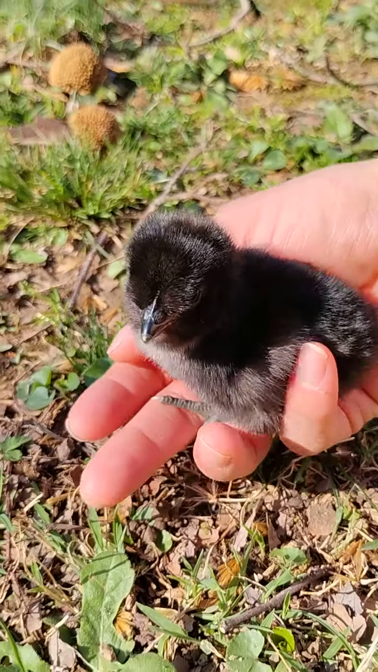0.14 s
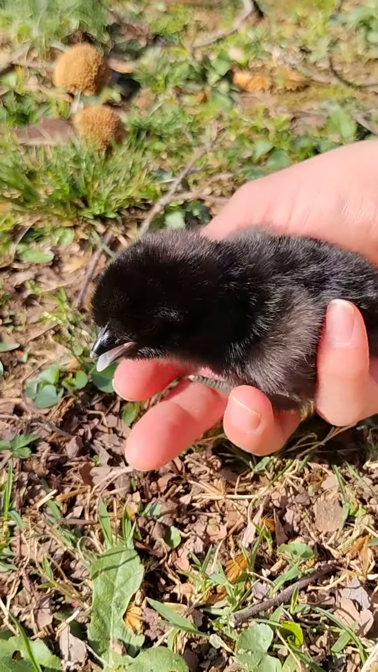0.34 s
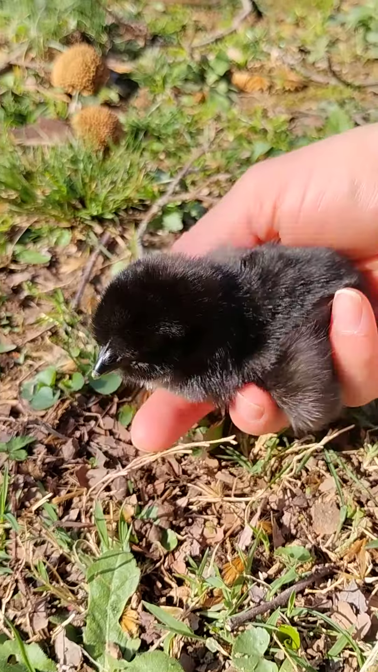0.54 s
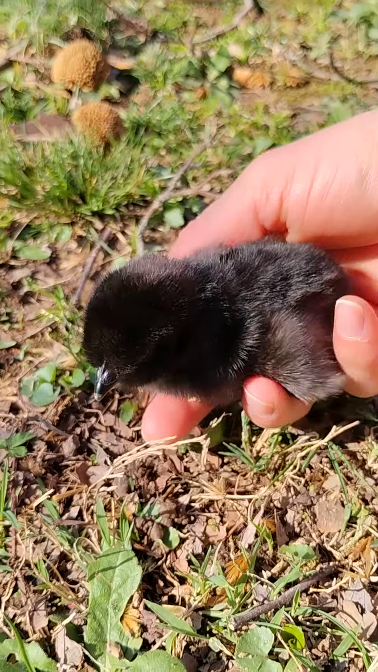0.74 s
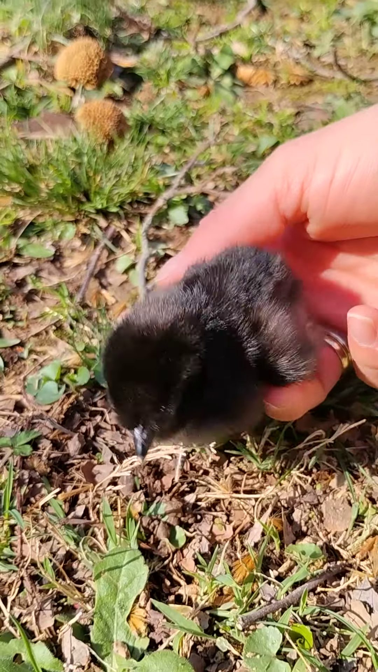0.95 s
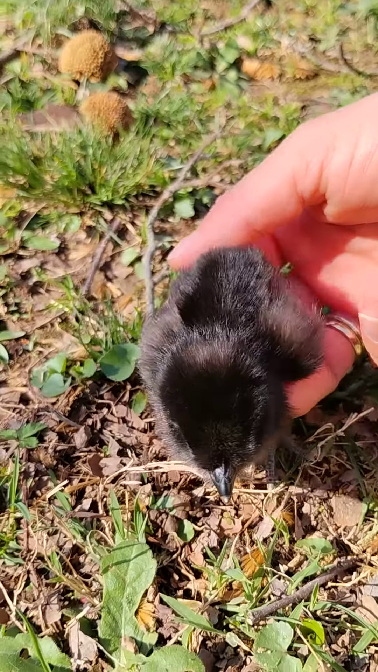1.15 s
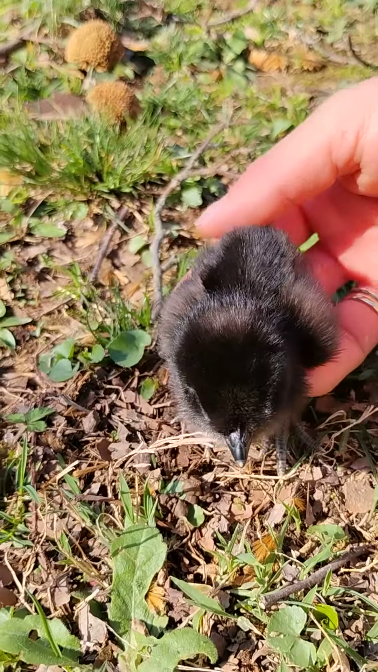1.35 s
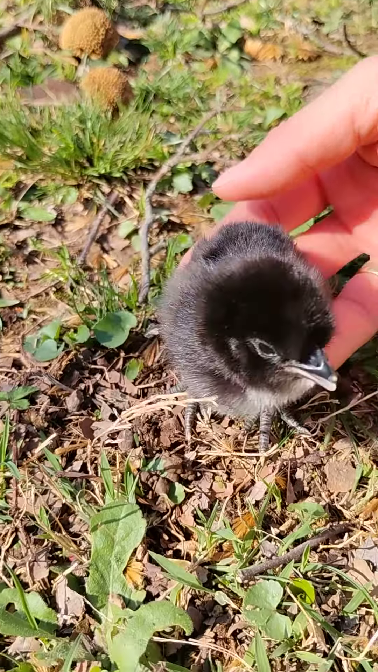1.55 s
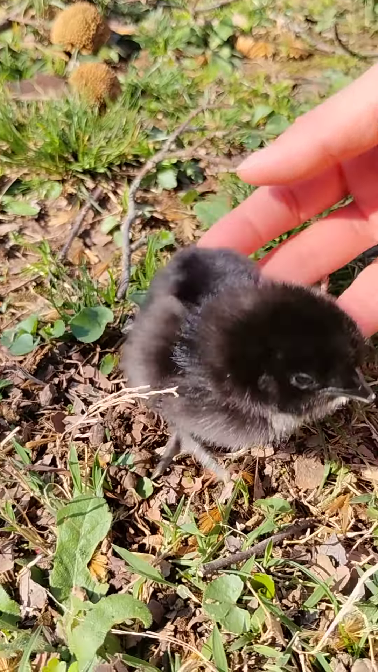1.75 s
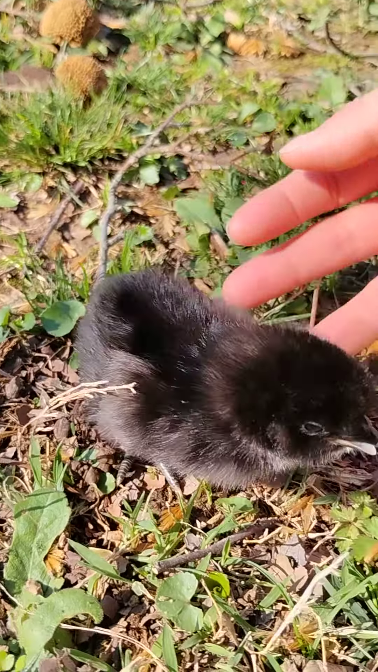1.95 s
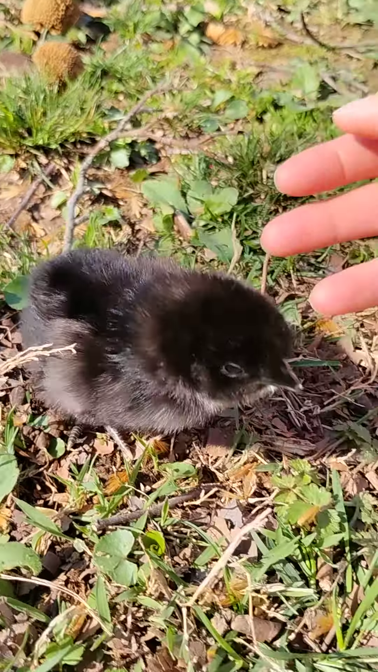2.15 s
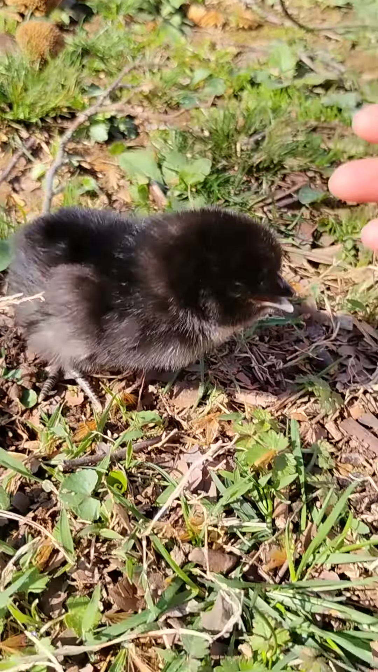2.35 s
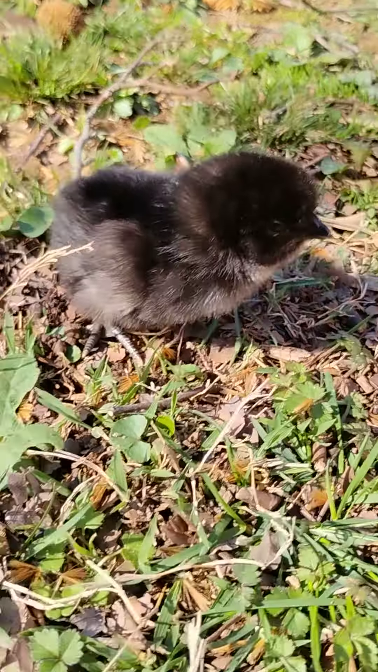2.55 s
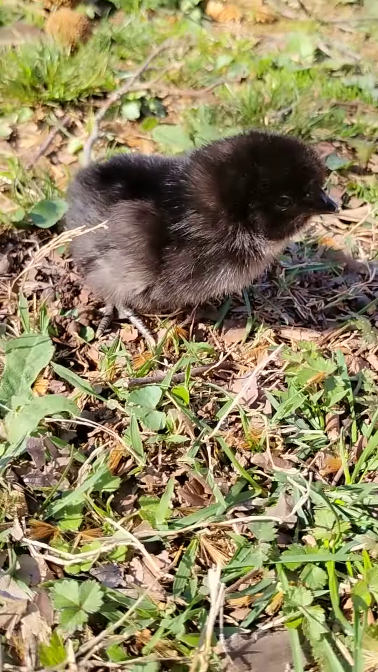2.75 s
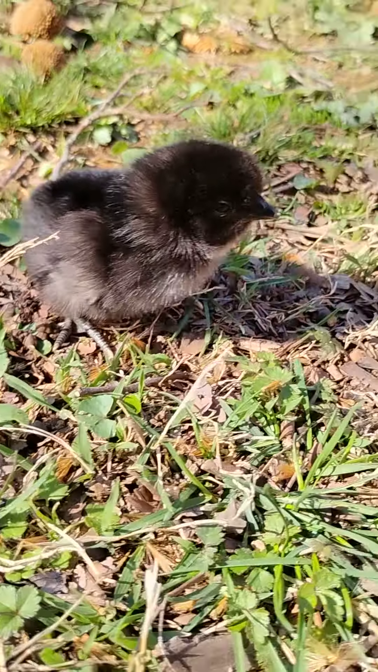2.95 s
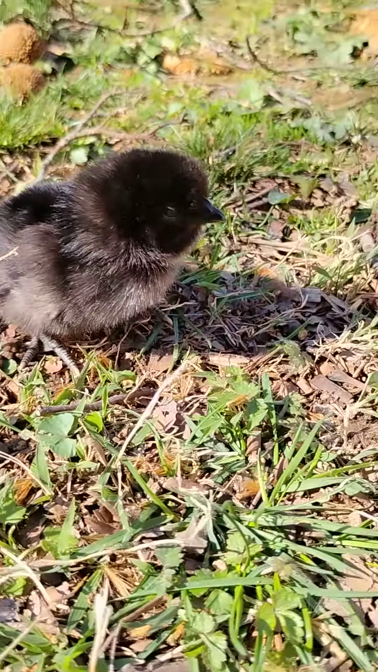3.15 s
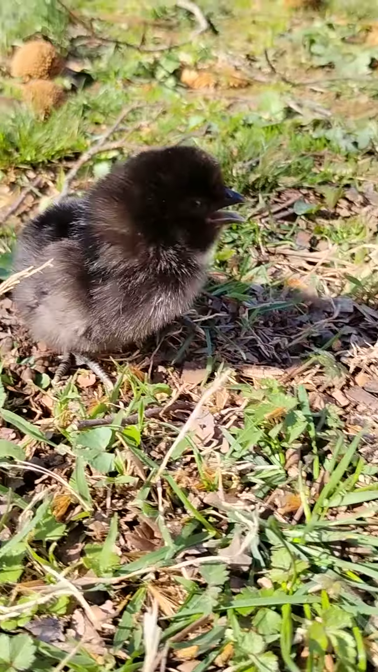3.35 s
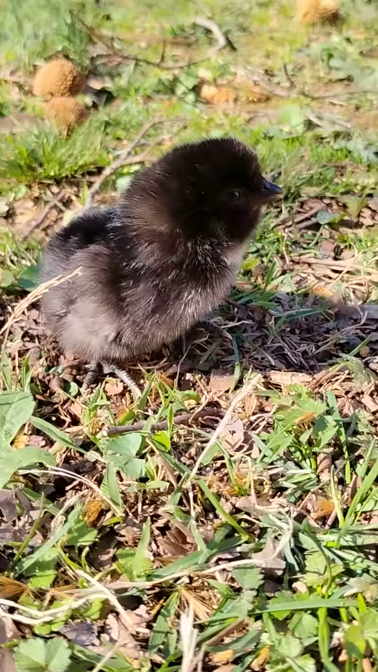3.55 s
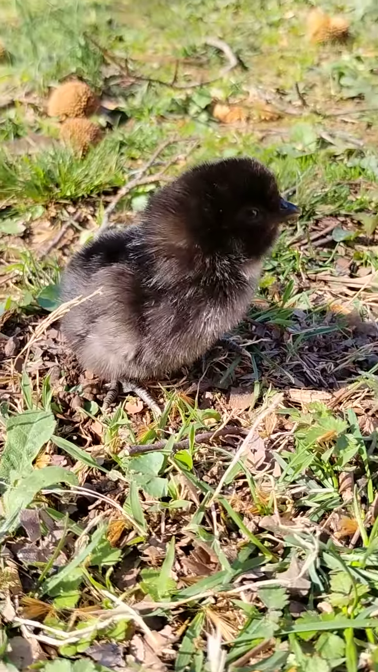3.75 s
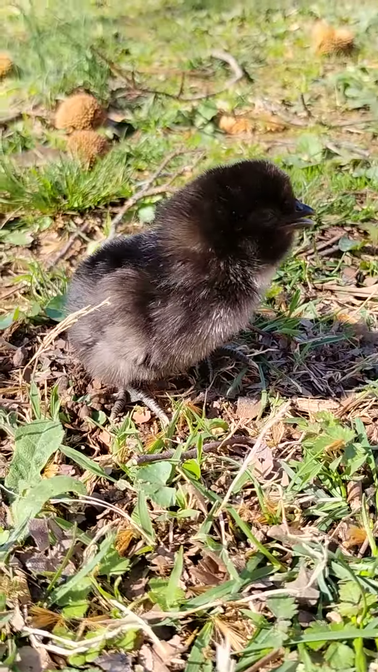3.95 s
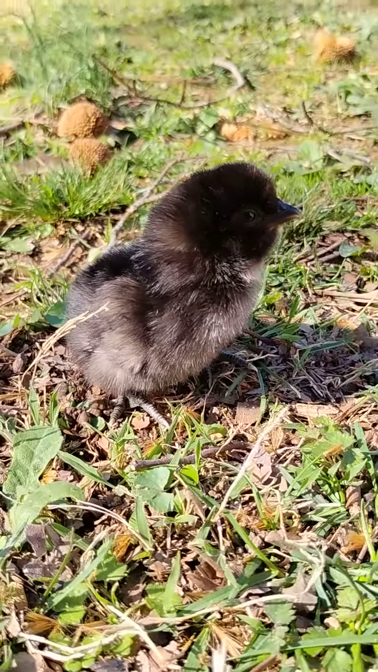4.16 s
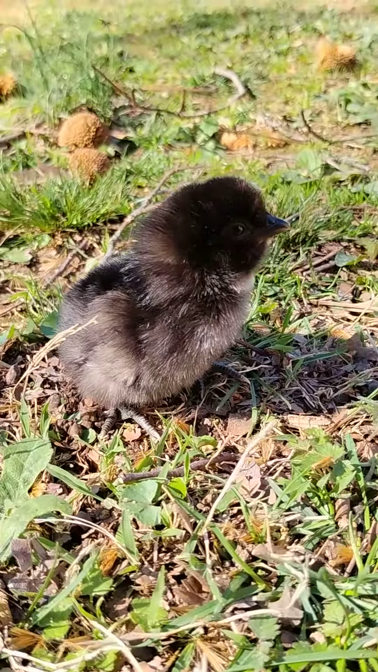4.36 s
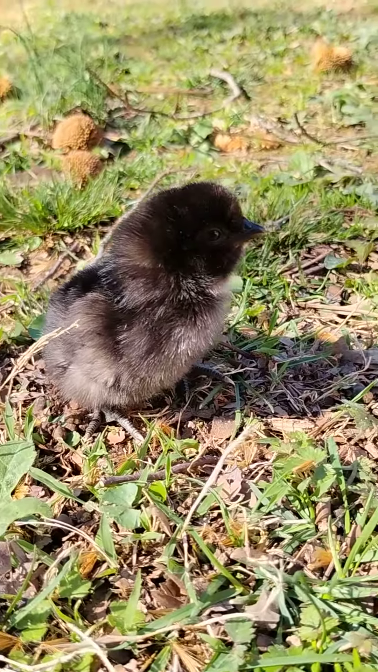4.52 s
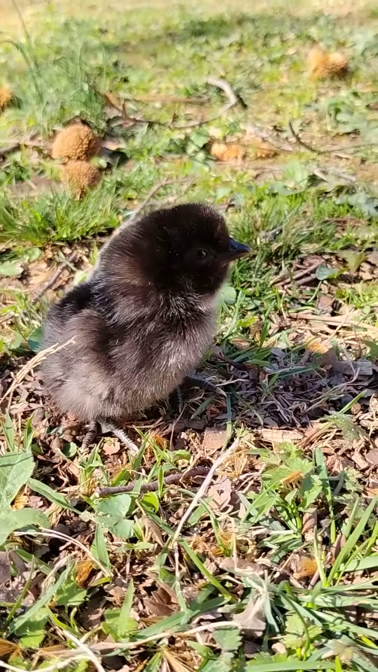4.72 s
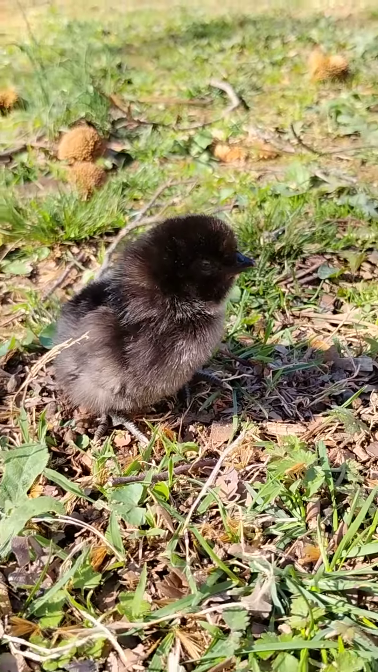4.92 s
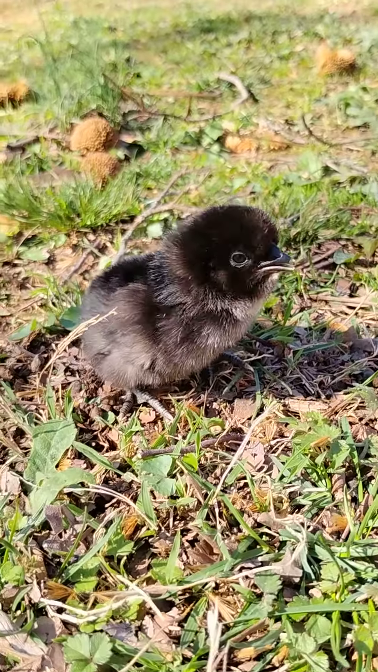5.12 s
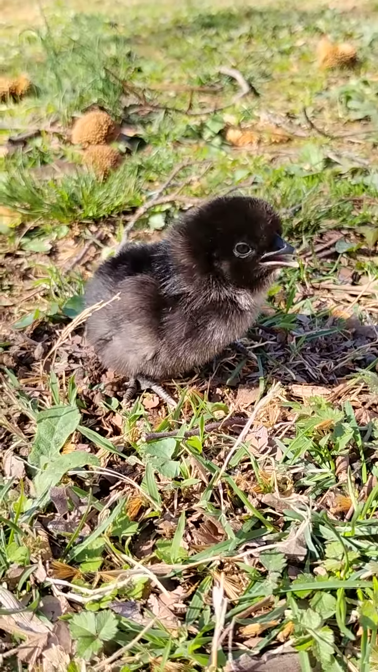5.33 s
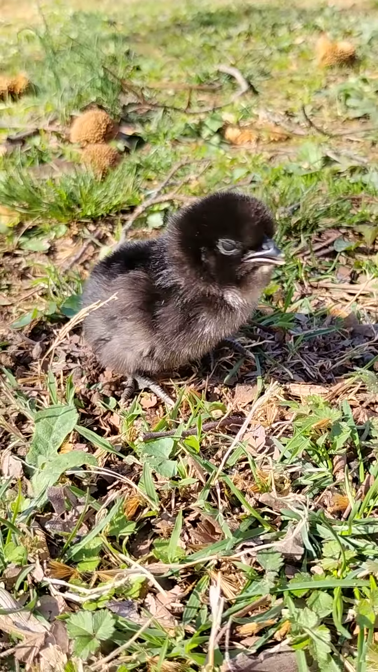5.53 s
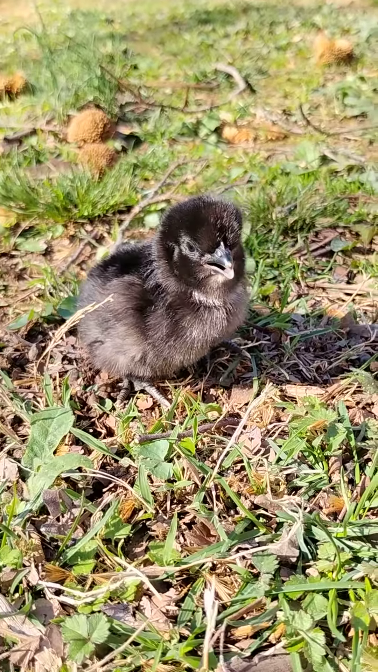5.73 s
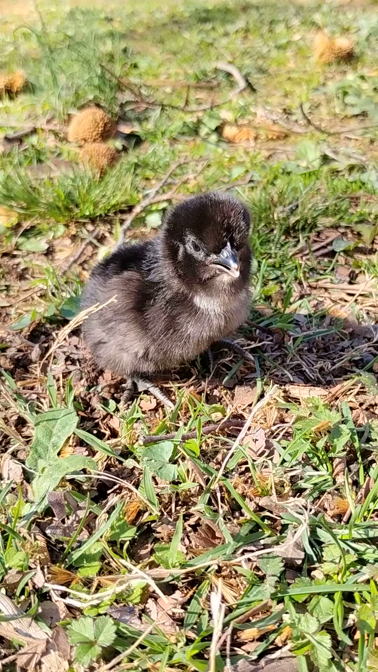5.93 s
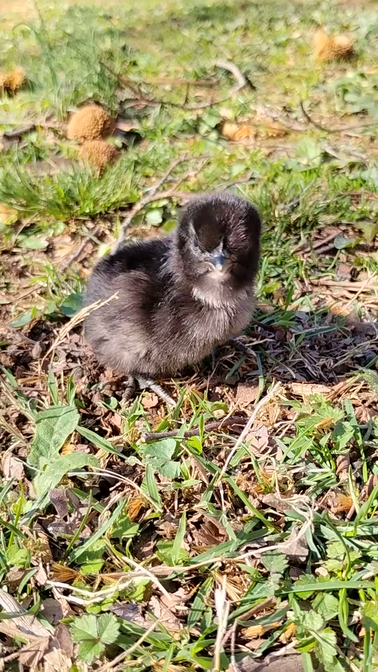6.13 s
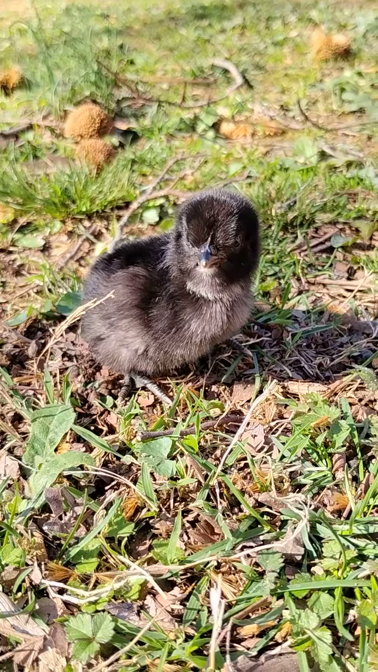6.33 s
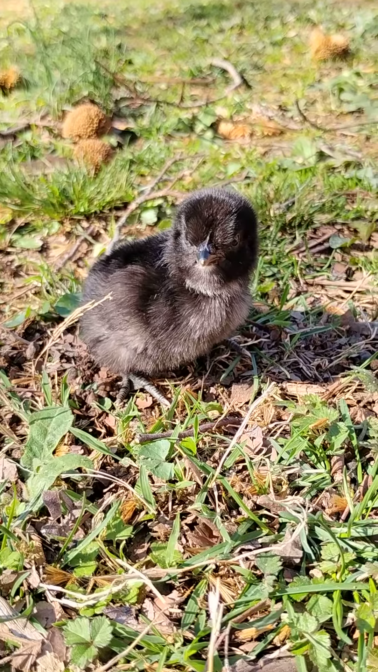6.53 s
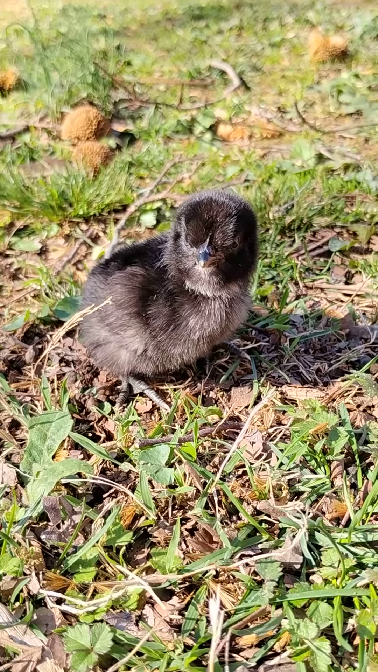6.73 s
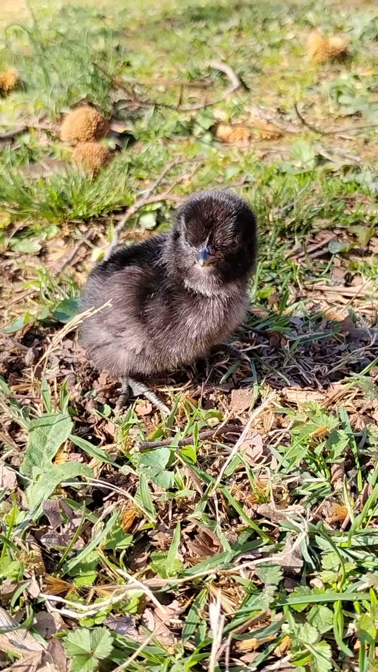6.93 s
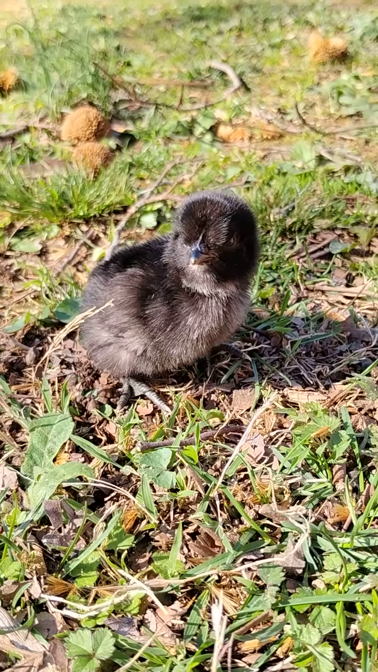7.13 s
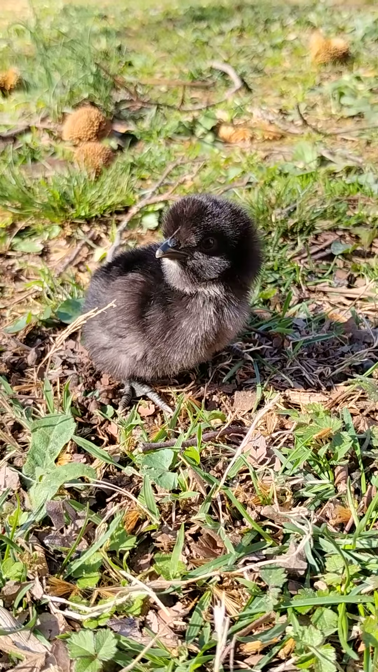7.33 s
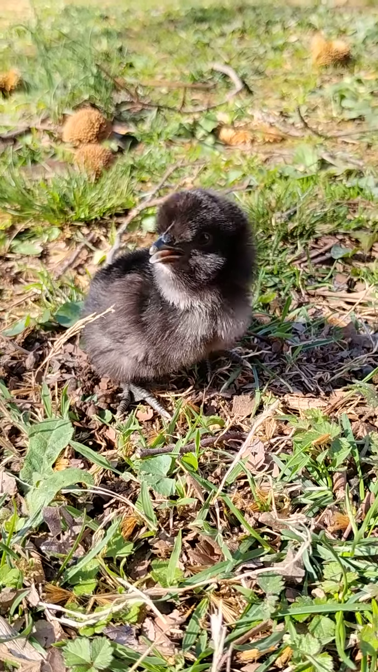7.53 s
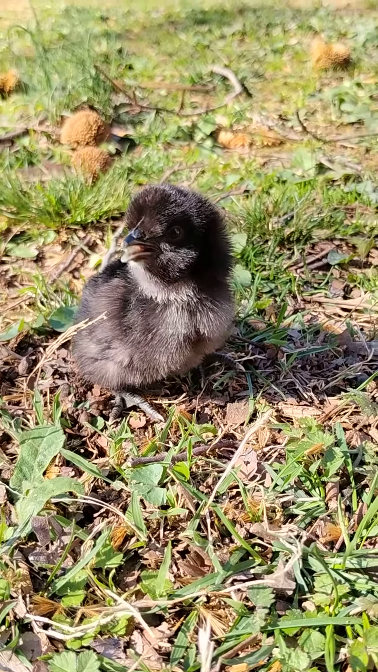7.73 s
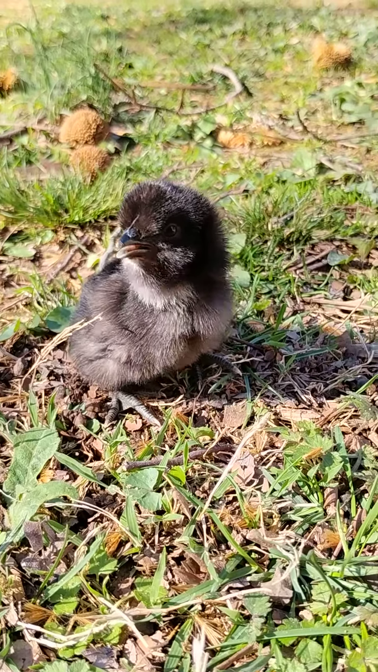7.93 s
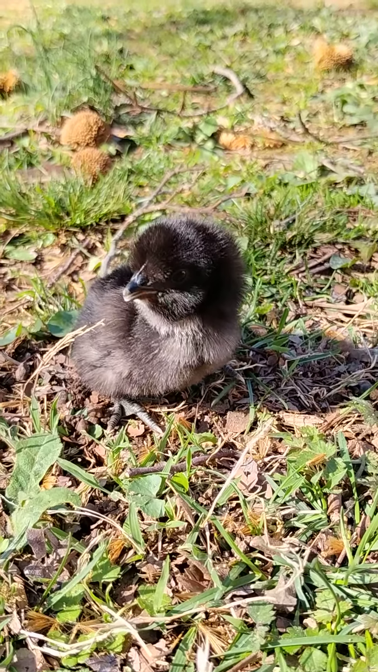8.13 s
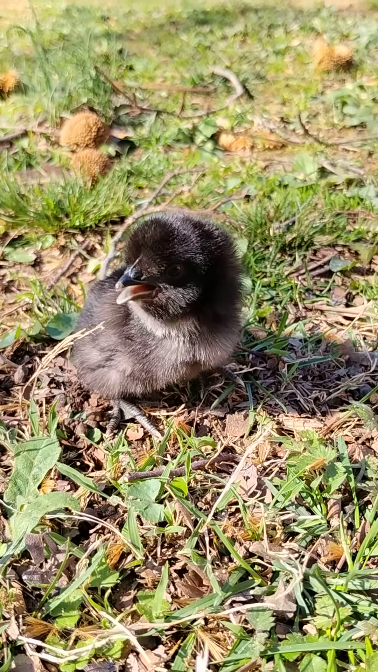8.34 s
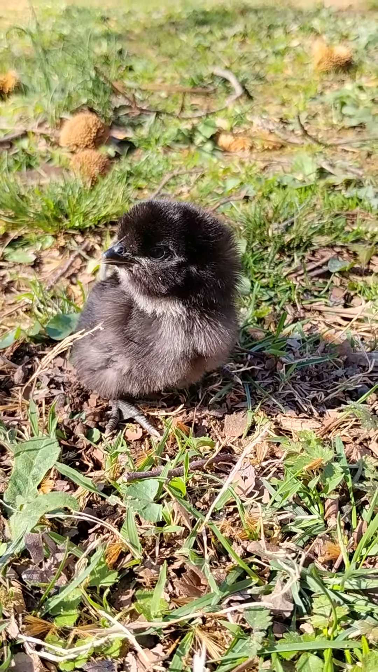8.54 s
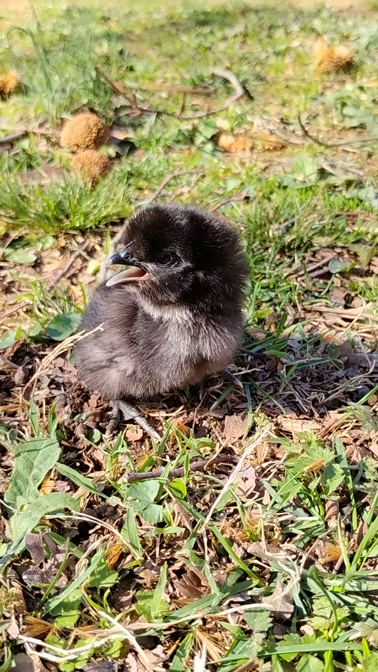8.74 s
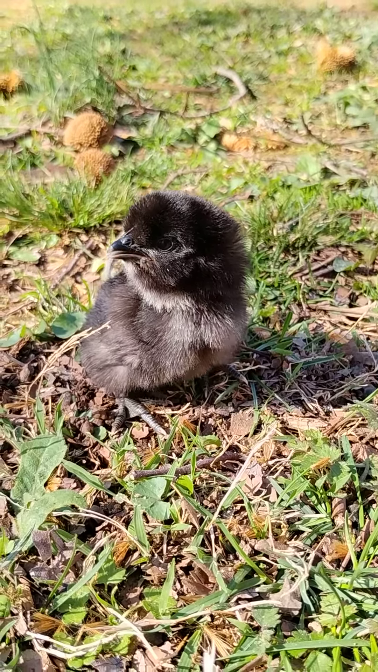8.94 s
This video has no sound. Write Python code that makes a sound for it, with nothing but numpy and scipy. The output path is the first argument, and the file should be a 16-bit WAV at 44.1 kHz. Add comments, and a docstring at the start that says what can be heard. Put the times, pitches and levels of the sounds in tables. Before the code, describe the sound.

A tiny chick close by gives fourteen or so loud, piercing peeps, each arching high then tumbling down raspily, over a faint distant engine hum outdoors.

```python
"""On a lawn a chick peeps close by: each peep is a high whistle that arches, tumbles down and turns raspy.
A far engine hums, swelling and fading: firing tone, octave and upper orders are sines, its roar is noise.
Wind rumbles and bumps as coloured noise; dry leaves rustle as noise, crackle and snap as ringing clicks.
Wild birds chip and whistle further off as short gliding sines. The chick's voice is a sine with overtones."""
import sys
import numpy as np
from scipy import signal
from scipy.fft import rfft, irfft, next_fast_len
from scipy.io import wavfile
from scipy.ndimage import uniform_filter1d, minimum_filter1d

SR = 44100
rng = np.random.default_rng(int(sys.argv[2]) if len(sys.argv) > 2 else 0)


def transcribe(u):
    """Save the signal u as a 16-bit wav file named by the first command-line argument.

    u: samples, shape (n,) or (channels, n), limited to [-1, 1]; the rate is SR.
    q: integer samples, one column per channel.
    """
    v = np.clip(np.atleast_2d(u).T, -1, 1)
    q = np.round(v * 32767).astype(np.int16)
    wavfile.write(sys.argv[1], SR, q)


N = 400428
TIME_S = np.arange(N) / SR
AIR_DB, CUTOFF_HZ = -73, 15800
GRASS_T60_S = .09
SAG_AT_S = .05   # the arch lies lower by its sag this long before and after the crest
HOOK_S = .004   # decay constant of the opening hook
LEAP_S, STEP_S = .0022, .0015   # transition widths: up a register, down to the tail
TAIL_END_HZ, TAIL_BEND = 2400, 1.9   # the tail plunges ever faster to this pitch
RASP_LEAD_S, RASP_RISE_S = .008, .007   # the rasp sets in a little before the break

# Levels are relative: gains in the functions follow. Balance is left minus right.
# steady air noise: [f/Hz, density/dB]
AIR_COLOUR = [(710, -29.5), (1200, -4.5), (1520, -10), (2510, -16), (2920, -19), (4070, -15), (4980, -32),
              (6730, -28), (15500, -29)]
# far engine, mean firing rate: [t/s, f/Hz]
ENGINE_FIRING_HZ = [(0, 109.6), (1.5, 107.8), (2.4, 108.6), (2.9, 107.4), (4.2, 107.4), (4.8, 105.8),
                    (6.3, 106.7), (7.4, 105.8), (9.08, 105.4)]
# weak upper engine orders: [multiple, level re exhaust curve/dB]
ENGINE_UPPER_ORDERS = [(3, -4.5), (5, -14.5)]
# firing tone: [t/s, level/dB]
FIRING_LEVEL = [(0, -58.5), (.55, -50), (1.05, -59), (1.3, -58), (1.85, -45), (2.6, -41), (3.05, -49.5),
                (3.7, -41), (4.8, -55.5), (5.85, -57), (7.1, -61.5), (7.35, -39), (8.1, -38), (8.3, -49),
                (8.55, -41), (9.08, -55.5)]
# its octave: [t/s, level/dB]
OCTAVE_LEVEL = [(0, -72), (.55, -44), (1.35, -45.5), (1.85, -29), (2.5, -48.5), (3.199, -55.5),
                (4.1, -35.5), (4.85, -38.5), (5, -54.5), (5.2, -35), (5.7, -49.5), (5.85, -42), (6.2, -56),
                (6.4, -47), (7.1, -73), (7.35, -42.5), (7.599, -36.5), (8.1, -60.5), (8.3, -36.5),
                (8.549, -44), (8.8, -37.5), (9.08, -53)]
# exhaust roar: [t/s, level/dB]
EXHAUST_LEVEL = [(0, -63), (.25, -69.5), (0.549, -60), (1.5, -59), (1.851, -52), (2.201, -50), (3.05, -60),
                 (3.5, -57), (4.1, -47.5), (4.45, -55), (4.85, -51.5), (5, -63.5), (5.199, -51.5),
                 (5.7, -60.5), (6.4, -70), (7.1, -69), (7.55, -54.5), (8, -63.5), (9.08, -62)]
# exhaust roar: [f/Hz, density/dB]
EXHAUST_COLOUR = [(130, -1.5), (250, 5.5), (330, -8.5), (420, -6.5), (520, -7.5), (590, 2.5), (700, -10.5),
                  (850, -8), (1050, -16), (1350, -28.5), (2000, -35.5), (2800, -37)]
# slow rise and fall of the breeze on the ports: [t/s, level/dB]
BREEZE_LEVEL = [(0, -67), (.3, -52.5), (1.2, -57.5), (2.6, -51), (3, -61), (7.1, -61.5), (7.5, -46),
                (8.1, -53), (9.08, -54)]
# gusts on top of it: [centre t/s, length/s, level/dB]
GUST_SWELLS = [(.52, 0.368, -47.5), (.82, 0.099, -44), (1.02, 0.1303, -37.5), (1.45, .22, -43),
               (1.85, 0.45, -38), (2.23, .15, -45.5), (6.5, 0.175, -58.5), (6.865, 0.036, -42)]
# breeze and gusts: [f/Hz, density/dB]
WIND_SPECTRUM = [(25, -22), (50, -6), (80, 3.5), (150, 0), (250, -9), (450, -26.5), (900, -45.5)]
# soft handling bumps: [centre t/s, length/s, level/dB]
HANDLING_BUMPS = [(0.427, 0.0246, -28.5), (0.509, 0.055, -32), (0.816, 0.0177, -41), (1.041, 0.035, -42.5),
                  (6.09, 0.049, -48.5)]
# handling bumps: [f/Hz, density/dB]
BUMP_SPECTRUM = [(40, -21.5), (120, 0.5), (350, 1), (600, -9.5), (1000, -32.5), (2000, -43.5)]
# dry leaves stirring: [t/s, level/dB]
RUSTLE_LEVEL = [(0, -72.5), (1.2, -70.5), (1.45, -77), (2.3, -66.5), (2.8, -60.5), (3.1, -71.5),
                (4.9, -72.5), (5.3, -76.5), (9.08, -76.5)]
# the hand brushes through them: [centre t/s, length/s, level/dB]
HAND_BRUSHES = [(2.57, .06, -42), (2.71, .09, -54), (3.65, .12, -66.5)]
# leaf rustle: [f/Hz, density/dB]
LEAF_COLOUR = [(650, -37), (1100, -10), (1280, -7.5), (2440, -3), (3500, -14), (4080, -13.5), (6610, -7.5),
               (9070, -4), (10500, -14), (15000, -32)]
# sharp snaps and small ticks: [t/s, click level/dB]
SNAP_CLICKS = [(1.051, -40.5), (1.208, -49.5), (1.895, -38.5), (2.285, -41), (2.864, -43), (2.939, -58.5),
               (3.169, -43.5), (3.368, -12), (3.641, -52), (3.674, -9.5)]
# resonances of the snaps: [f/Hz, level/dB, t60/s]
SNAP_RESONANCES = [(961, -15.5, 0.0078), (1340, -15.5, 0.024), (2100, -10, 0.016), (3040, 5.5, 0.0079),
                   (4300, -5, 0.0013), (7232, -3.5, 0.0023)]
# wild birds: [t/s, length/s, start f/Hz, middle f/Hz, end f/Hz, level/dB]
BIRD_CALLS = [(0.786, 0.055, 3600, 4234, 4300, -69), (1.516, 0.0478, 8245, 6990, 7080, -45),
              (1.845, 0.029, 5644, 7180, 7660, -42.5), (2.657, 0.38, 2100, 2855, 4240, -67),
              (2.822, 0.03, 8720, 7070, 6750, -42.5), (3.284, 0.2, 2810, 2111, 1708, -55.5),
              (4.089, 0.016, 10000, 7470, 6600, -41.5), (4.913, 0.033, 9300, 7200, 9500, -47.5),
              (5.261, 0.025, 5630, 7110, 7393, -53.5), (6.129, 0.01583, 5580, 7330, 8270, -43),
              (6.538, 0.014, 10000, 7060, 6380, -42), (6.661, 0.0217, 6401, 7680, 8150, -66),
              (6.86, .014, 6000, 7390, 7770, -46), (8.002, 0.044, 8370, 7020, 9040, -47),
              (9.014, 0.042, 8140, 7800, 9530, -58)]
# Each peep: a high arch, a break down to a sagging shelf, a step down to a short tail.
# "tone" is four columns that add to the throat's: level/dB, overtones/dB, balance/dB, right-ear lag/ms.
# arches: [t/s, time to crest/s, attack constant/s, crest f/Hz, sag/Hz, opening hook/Hz, tone x 4,
# third and higher harmonics/dB]
PEEP_ARCHES = [(-0.05, 0.062, 0.0086, 5676.0, 1079.0, -5, 0.9, -15, -11.5, -0.026, -6.5),
               (0.375, 0.065, 0.0114, 5414, 816, 1279, 1.5, -2.5, 1.8, -0.0088, -20.5),
               (1.529, 0.073, 0.014, 5196, 333.0, 275.5, -3, -13.7, -9, -0.052, -6),
               (1.918, 0.059, 0.0048, 5116.0, 728, 249, -11.5, -0.12, 4, -0.112, -10),
               (2.348, 0.065, 0.04, 5134, 676, 785.5, 6.5, -3, -1.5, -0.0385, -20),
               (3.422, 0.0271, 0.0095, 4755, 215.3, -185.0, -7, -13.5, -3, 0.022, -0.5),
               (3.889, 0.048, 0.031, 5708, 912.0, 652, -0.5, -23.3, -9.7, -0.045, -8),
               (5.045, 0.0132, 0.058, 4735, 336, -105.0, 1.5, -9.5, -5, 0.059, 0.0),
               (5.446, 0.069, 0.003, 5145, 427.0, 295.5, -2.65, -10, -7.4, 0.059, -1.5),
               (5.849, 0.11945, 0.0067, 5570, 195.7, 99.5, -0.5, -4.5, -8.5, 0.046, -8),
               (7.497, -0.049, 0.0146, 5024, 102.3, -473.0, -2.2, -10, -3.5, -0.12, 0.0),
               (7.854, 0.051, 0.014, 4703, 308.0, 49.5, 0.7, 4, 2.5, 0.1244, -7.5),
               (8.306, 0.055, 0.0081, 4705.0, 260.4, -21, -1.5, 1, 2.47, 0.064, -4.5),
               (8.819, 0.0395, 0.0123, 4714, 174.0, -38, -1.6, 1.5, 1.5, 0.084, 0.0)]
# leaps to a higher register within some arches: [t/s, rise/Hz, change of tone x 4]
REGISTER_LEAPS = [(0.3956, 423, -0.6, -18.5, -15, -0.034), (1.5548, 433.1, 2.5, -16, -11.5, 0.003),
                  (1.9378, 578.9, 10.5, -26, -23.5, -0.005), (2.3755, 628.9, -8, -18, -9.1, -0.017),
                  (3.4607, 711, 2.8, -17, -12, -0.011), (5.4754, 599.0, -2, -7.0, 6, -0.024),
                  (5.8813, 376.8, -4.5, -4.8, 10.5, -0.088)]
# shelves: [break t/s, break transition width/s, first f/Hz, last f/Hz, tone x 4]
PEEP_SHELVES = [(0.04, 0.0037, 4093, 3584, 0.67, -5, -1.16, 0.0178),
                (0.4666, 0.004, 4148.0, 3684.0, -0.9, -5.5, -0.5, 0.005),
                (1.579, 0.0043, 4371.0, 3530, -1.24, -3.1, -2.2, -0.014),
                (1.9938, 0.0062, 4176, 3501, -1.61, 5, -0.3, -0.082),
                (2.4268, 0.0047, 4213, 3645, 0.37, 1.5, 1.5, -0.0042),
                (3.482, 0.002, 4366, 3435, -0.9, -6, 2, 0.011),
                (3.9598, 0.00375, 4310, 3609, -0.1, -2, 0, 0.0097),
                (5.1188, 0.00443, 4103.0, 3646, 0.613, -1.5, -2.5, -0.011),
                (5.5214, 0.0058, 4380, 3697, 0.4, -3, -0.8, -0.018),
                (5.9356, 0.00591, 4291, 3700, 1, 0.5, -6, -0.0025),
                (7.5712, 0.0051, 4191, 3770, -1.75, -2.8, -4, 0.073),
                (7.9495, 0.0042, 4144, 3736, 0.13, 5, -0.2, 0.092),
                (8.408, 0.00441, 4100, 3707, -0.15, 0.84, 0, 0.057),
                (8.9158, 0.003, 4150.0, 3680, -0.79, 2.5, -0.4, 0.078)]
# tails: [step t/s, length/s, first f/Hz, tone x 4]
PEEP_TAILS = [(0.076, 0.0232, 3175, 0, 10.4, 5, -0.18), (0.4952, 0.024, 3227, 5, 8.8, 17.5, -0.0705),
              (1.6176, 0.02, 3190, 1.2, 12.2, 12.5, -0.049), (2.0287, 0.0175, 3165, -6, 13.58, 7.5, -0.146),
              (2.4652, 0.02, 3228.0, 3, 6.5, 12, -0.02), (3.5205, 0.02186, 3120, 6.4, 0.8, -0.5, 0.019),
              (4.0014, 0.0184, 3210, 3, 1.5, -3.6, 0.018),
              (5.1546, 0.01914, 3225.0, 1.8, 1.14, -5.8, 0.0029),
              (5.562, 0.02067, 3335, -1.3, 4.1, 1.5, 0.027), (5.9774, 0.01627, 3397, 0.8, 6.5, 6.7, -0.019),
              (7.6062, 0.024, 3328, -2.2, 4.2, 3, -0.038), (7.986, 0.021, 3310, -2, 8.1, 2, -0.057),
              (8.4467, 0.019, 3333, 0.52, 6, 4, -0.048), (8.9558, 0.025, 3291, 0.4, 6.9, 5, -0.056)]
# tone shared by all peeps: [pitch f/Hz, tone x 4]
THROAT_TONE = [(2400.0, -41.5, -5, 3, 0.207), (2861, -24, -4.5, -6.5, 0.199), (3132, -18, -10.5, 1, 0.189),
               (3500.0, -7.5, -17.5, 0.5, 0.15), (3754, -6.5, -13.5, 1.04, 0.09),
               (3790, -5, -13.5, 1.74, 0.1), (4300.0, -7, -17, -9, 0.09),
               (4550.0, -6.5, -16.5, -10.5, 0.134), (4930, -8, -14.5, -1, 0.138),
               (4907, -10, -18.5, -3.5, 0.186), (5800.0, -8.5, -6, 3, 0.201)]
# colour of the third and higher harmonics: [f/Hz, level/dB]
BEAK_COLOUR = [(7500, -19), (8700, -18.5), (9700, -1), (10500, -12.5), (11500, -9), (12300, -20.5),
               (13000, -12), (13800, -9.5), (14200, -13.5), (14600, -20), (15300, -13.5), (16500, -25.5)]
# overtones at the two ports: [f/Hz, balance/dB]
OVERTONE_BALANCE = [(5000, 10), (6500, -14), (7500, 3.5), (8200, -6), (9300, 18), (10300, 24.5),
                    (11500, 14), (13000, 3.5), (15500, 0.5)]
# breathy rasp, mainly of the falling voice: [f/Hz, density/dB]
RASP_COLOUR = [(3800, -9.5), (4600, -0.5), (5600, -7.5), (6600, -8), (7600, 0.5), (9500, -1.5),
               (10600, -4.5), (11500, -4), (12400, -13.5), (13400, -4.5), (14500, -9), (15500, -11)]
# quick tremolo that opens one peep: [start t/s, end t/s, rate f/Hz, depth 0-1]
OPENING_TREMOLO = (3.889, 3.915, 235, .65)


def from_db(db):
    """Amplitude ratio of a level in dB."""
    return 10 ** (np.asarray(db) / 20)


def rms_one(x):
    """Scales to rms 1."""
    return x / np.sqrt(np.mean(x ** 2) + 1e-20)


def curve(rows):
    """A two-column table read along time."""
    t, value = np.transpose(rows)
    return np.interp(TIME_S, t, value)


def at_hz(points, hz):
    """A spectrum table read on a log-frequency axis."""
    f, value = np.transpose(points)
    return np.interp(np.log(np.maximum(hz, 1)), np.log(f), value)


def low_pass(x, order, hz):
    """Butterworth cut of the highs."""
    return signal.sosfilt(signal.butter(order, hz, fs=SR, output="sos"), x)


def high_pass(x, hz):
    """Steep Butterworth cut of the lows."""
    return signal.sosfilt(signal.butter(4, hz, "high", fs=SR, output="sos"), x)


def band_pass(x, low_hz, high_hz):
    """Keeps one band, with gentle skirts."""
    return signal.sosfilt(signal.butter(2, [low_hz, high_hz], "band", fs=SR, output="sos"), x)


def drift(rate_hz):
    """Random wander of rms 1, linear between steps at this rate."""
    steps = rng.standard_normal(int(N / SR * rate_hz) + 2)
    return rms_one(np.interp(TIME_S * rate_hz, np.arange(len(steps)), steps))


def tremble(top_hz):
    """Random unsteadiness of rms 1, low-passed at top_hz."""
    return rms_one(low_pass(rng.standard_normal(N), 6, top_hz))


def swells(rows):
    """Summed gain of bell-shaped swells; length is the full width at 1/e."""
    return sum(from_db(db) * np.exp(-(2 * (TIME_S - centre_s) / length_s) ** 2)
               for centre_s, length_s, db in rows)


def switch(t, at_s, width_s):
    """Goes smoothly from 0 to 1 around a moment."""
    return .5 + .5 * np.tanh((t - at_s) / width_s)


def eased(control, size=110):
    """Rounds the corners of a control: throat and beak cannot jump."""
    once = uniform_filter1d(control, size, mode="nearest")
    return uniform_filter1d(once, size, mode="nearest")


def panned(balance_db):
    """Left and right gains of constant power; positive is left."""
    gains = from_db(np.array([balance_db, -balance_db]).reshape(2, -1) / 2)
    return gains / np.sqrt(np.mean(gains ** 2, axis=0))


def noise(spectrum, alike):
    """Stereo noise of rms 1 and given colour, falling away beyond its ends; alike is the correlation."""
    size = next_fast_len(N)
    hz = np.fft.rfftfreq(size, 1 / SR) + 1
    skirts = np.minimum(1, hz / spectrum[0][0]) ** 2 * np.minimum(1, spectrum[-1][0] / hz) ** 2
    white = rfft(rng.standard_normal((2, size)))
    mid, side = irfft(white * from_db(at_hz(spectrum, hz)) * skirts, size)[:, :N]
    return rms_one(np.sqrt(1 + alike) * mid + np.sqrt(1 - alike) * side * [[1], [-1]])


def ring(clicks, hz, t60_s):
    """Two-pole resonator: each click starts a decaying sine."""
    radius, w = from_db(-60 / (t60_s * SR)), 2 * np.pi * hz / SR
    return signal.lfilter([0, np.sin(w)], [1, -2 * radius * np.cos(w), radius * radius], clicks + 1e-18)


def scatter(x, t60_s, dull_hz):
    """Dense faint reflections: decaying noise of up to 1 s, different in each ear."""
    tail = rng.standard_normal((2, SR)) * from_db(-60 * TIME_S[:SR] / t60_s)
    tail /= np.sqrt(np.sum(tail ** 2) / 2)
    return signal.fftconvolve(x, low_pass(tail, 2, dull_hz), axes=1)[:, :N]


def air():
    """Steady, faint coloured noise."""
    return from_db(AIR_DB) * noise(AIR_COLOUR, alike=0.18)


def engine(firing_db=1.0, octave_db=0.44, roar_db=7.5, waver=0.0032):
    """Firing tone and octave swell separately on their way over the ground, above a dull roar."""
    firing, octave, roar = [from_db(curve(rows)) for rows in (FIRING_LEVEL, OCTAVE_LEVEL, EXHAUST_LEVEL)]
    firing_hz = curve(ENGINE_FIRING_HZ) * (1 + waver * drift(9.2))
    phase = 2 * np.pi * np.cumsum(firing_hz) / SR
    hum = from_db(firing_db) * firing * np.sin(phase) * panned(0.868)
    hum += from_db(octave_db) * octave * np.sin(2 * phase + [[.2], [-.2]]) * panned(-2.5)
    for order, level_db in ENGINE_UPPER_ORDERS:
        hum += roar * from_db(level_db + 0.74 * drift(9.2)) * np.sin(order * phase) * panned(10.0)
    exhaust = noise(EXHAUST_COLOUR, alike=0.64)
    # moving air lets each range swell on its own
    for low_hz, high_hz in [(280, 310), (500, 510), (750, 1900)]:
        exhaust = exhaust + 0.61 * drift(3.3) * band_pass(exhaust, low_hz, high_hz)
    return np.sqrt(2) * hum + from_db(roar_db) * roar * exhaust * panned(-3.5)


def wind(gust_db=6.5, lumpy_db=1.5):
    """Breeze and gusts give a lumpy rumble, largely its own on each port."""
    flow = from_db(curve(BREEZE_LEVEL)) + swells(GUST_SWELLS)
    flow *= from_db(gust_db + lumpy_db * drift(25))
    return flow * noise(WIND_SPECTRUM, alike=.3)


def bumps():
    """Soft handling bumps: short swells of low noise."""
    return swells(HANDLING_BUMPS) * noise(BUMP_SPECTRUM, alike=.3)


def leaf_rustle(grain_db=1.0, ticks_per_s=25, tick_db=14):
    """Stirred leaves: grainy noise, and tiny ringing crackles that grow with it."""
    brushing = from_db(curve(RUSTLE_LEVEL)) + swells(HAND_BRUSHES)
    grain = rms_one(from_db(grain_db * drift(500)))
    rustle = brushing * grain * noise(LEAF_COLOUR, alike=0.36)
    clicks = (rng.random(N) < ticks_per_s / SR) * rng.standard_normal((2, N))
    crackles = ring(clicks, 8200, .002) - ring(clicks, 9800, .003)
    return rustle + from_db(tick_db) * brushing * crackles


def leaf_snaps(low_hz=864.6, top_hz=9000, right_lag_s=0.0001672):
    """Brittle snaps: band-limited clicks ring short modes, later but slightly louder on the right."""
    clicks = np.zeros(N)
    for t_s, db in SNAP_CLICKS:
        clicks[round(t_s * SR)] = from_db(db)
    clicks = low_pass(high_pass(clicks, low_hz), 4, top_hz)
    left = sum(from_db(db) * ring(clicks, hz, t60_s) for hz, db, t60_s in SNAP_RESONANCES)
    right = np.interp(TIME_S - right_lag_s, TIME_S, left)
    snaps = np.array([left, right]) * panned(-1.0)
    return snaps + from_db(-27.0) * scatter(snaps, t60_s=0.16, dull_hz=8950)


def wild_birds(waver_hz=45):
    """Thin whistles, each one curved, wavering glide, blurred by the trees."""
    calls, waver = np.zeros(N), drift(400)
    for start_s, length_s, *pitches_hz, level_db in BIRD_CALLS:
        span = np.flatnonzero((TIME_S >= start_s) & (TIME_S < start_s + length_s))
        u = np.linspace(0, 1, len(span))
        glide = np.polyfit([0, .5, 1], pitches_hz, 2)
        pitch_hz = np.polyval(glide, u) + waver_hz * waver[span]
        envelope = from_db(level_db) * np.sqrt(np.abs(np.sin(np.pi * u)))
        calls[span] += envelope * np.sin(2 * np.pi * np.cumsum(pitch_hz) / SR)
    calls = calls * from_db(2.5 * drift(120)) * panned(1)   # the far path makes them flicker
    bright_blur = from_db(-1.5) * scatter(calls, t60_s=0.3, dull_hz=10000)
    dull_blur = from_db(1.0) * scatter(calls, t60_s=0.38, dull_hz=3200)
    return calls + bright_blur + dull_blur


def tremolo():
    """Gain of the voice while it trembles, dying away as the whistle settles."""
    start_s, end_s, rate_hz, depth = OPENING_TREMOLO
    window = np.interp(TIME_S, [start_s, (start_s + end_s) / 2, end_s], [1, 1, 0], left=0)
    return 1 + depth * window * np.sin(2 * np.pi * rate_hz * (TIME_S - start_s))


def peep(arch, shelf, tail, crossing_db=-1.0):
    """Samples, pitch and tone of one peep; the voice passes smoothly through each change of register."""
    start_s, crest_s, attack_s, crest_hz, sag_hz, hook_hz, *arch_tone, _ = arch
    break_at_s, break_s, shelf_from_hz, shelf_to_hz, *shelf_tone = shelf
    step_at_s, tail_s, tail_hz, *tail_tone = tail
    span = np.flatnonzero((TIME_S >= start_s) & (TIME_S <= step_at_s + tail_s))
    t = TIME_S[span]

    hook = hook_hz * np.exp((start_s - t) / HOOK_S)
    arch_pitch = crest_hz - sag_hz * ((t - start_s - crest_s) / SAG_AT_S) ** 2 + hook
    shelf_pitch = np.interp(t, [break_at_s, step_at_s], [shelf_from_hz, shelf_to_hz])
    plunge = np.clip((t - step_at_s) / tail_s, 0, 1) ** TAIL_BEND
    tail_pitch = tail_hz + (TAIL_END_HZ - tail_hz) * plunge

    # rows of voice: pitch, then the four of tone
    voice, crossings = np.array(np.broadcast_arrays(arch_pitch, *arch_tone)), 0
    for leap_s, *change in REGISTER_LEAPS:
        if start_s < leap_s < break_at_s:
            leapt = switch(t, leap_s, LEAP_S)
            voice = voice + np.outer(change, leapt)
            crossings = crossings + np.sin(np.pi * leapt)
    parts = [(shelf_pitch, shelf_tone, switch(t, break_at_s, break_s)),
             (tail_pitch, tail_tone, switch(t, step_at_s, STEP_S))]
    for part_pitch, part_tone, entered in parts:
        part = np.array(np.broadcast_arrays(part_pitch, *part_tone))
        voice = voice + entered * (part - voice)
        crossings = crossings + np.sin(np.pi * entered)

    pitch_hz, *tone = voice
    throat_hz, *throat = np.transpose(THROAT_TONE)
    level_db, overtone_db, balance_db, lag_ms = [
        eased(own + np.interp(pitch_hz, throat_hz, shared)) for own, shared in zip(tone, throat)]
    attack = 1 - np.exp((start_s - t) / attack_s)
    level = from_db(level_db + crossing_db * eased(crossings)) * attack
    return span, pitch_hz, level, overtone_db, balance_db, lag_ms


def chick(jitter=.0008, fall_jitter=0.0056, catch_db=1.7, catch_s=.005, step_db=-14, rasp_db=-36,
          arch_breath=.04, strain_breath=.08, strain_flutter_db=0.3834, breath_follows=0.32,
          shimmer_db=4.0, grain_db=1.5, edge_s=0.0024):
    """The syrinx whistles purely on the arch; as tension drops it grows unsteady and breathy."""
    tones, breath = np.zeros((2, N)), np.zeros(N)
    wobble, flutter = tremble(570), tremble(550)
    shimmer = {k: shimmer_db * drift(110) for k in range(2, 6)}   # each overtone wavers on its own
    grain = {k: grain_db * tremble(700) for k in range(2, 6)}   # and roughens in the fall
    for arch, shelf, tail in zip(PEEP_ARCHES, PEEP_SHELVES, PEEP_TAILS):
        span, pitch_hz, level, overtone_db, balance_db, lag_ms = peep(arch, shelf, tail)
        t, treble_db = TIME_S[span], arch[-1]
        slack = switch(t, shelf[0] - RASP_LEAD_S, RASP_RISE_S)   # 0 on the arch, 1 in the fall
        strain = eased(np.clip((pitch_hz - 4900) / 800, 0, 1))   # the highest register leaks air too
        pitch_hz = pitch_hz * (1 + (jitter + fall_jitter * slack) * wobble[span])

        edges = np.sin(np.pi / 2 * np.clip(np.minimum(t - t[0], t[-1] - t) / edge_s, 0, 1))
        catch = np.exp(-(t - t[0]) / catch_s)   # the voice scratches as it starts
        flutter_db = (strain_flutter_db * strain + catch_db * catch) * flutter[span]
        level = edges * level * from_db(flutter_db)

        ear_lag = pitch_hz * lag_ms / 1000 * [[.5], [-.5]]   # cycles
        phase = 2 * np.pi * (np.cumsum(pitch_hz) / SR + ear_lag)
        voice = panned(balance_db) * np.sin(phase)
        for k in range(2, 6):
            overtone_hz = k * pitch_hz
            colour_db = 0
            if k > 2:
                colour_db = at_hz(BEAK_COLOUR, overtone_hz) + step_db * (k - 3) + treble_db * (1 - slack)
            gain = from_db(overtone_db + colour_db + shimmer[k][span] + slack * grain[k][span])
            gain = gain * (overtone_hz < SR / 2)
            ports = panned(eased(at_hz(OVERTONE_BALANCE, overtone_hz), size=50))
            voice += gain * ports * np.sin(k * phase)
        tones[:, span] += np.sqrt(2) * level * voice

        fall_breath = np.interp(pitch_hz, [3300, 4200], [1.2, .5])
        leak = arch_breath + strain_breath * strain + slack * fall_breath
        breath[span] = level.max() * (level / level.max()) ** breath_follows * leak
    rasp = high_pass(breath * noise(RASP_COLOUR, alike=0.0), hz=4000)
    return high_pass(tones, hz=2000) + from_db(rasp_db) * rasp


def scene():
    """The peeps glance off the grass nearby; their loud middle register returns faintly from the garden."""
    background = air() + engine() + wind() + bumps() + leaf_rustle() + leaf_snaps() + wild_birds()
    peeps = chick() * tremolo()
    grass = from_db(-23.0) * scatter(peeps, t60_s=GRASS_T60_S, dull_hz=13000)
    middle = band_pass(peeps, low_hz=2700, high_hz=4300)
    garden = from_db(-43) * scatter(middle, t60_s=0.42, dull_hz=6000)
    return background + peeps + grass + garden


def record(dry):
    """A fast, smooth limiter holds peaks to .95 of full scale; then the top is cut steeply."""
    needed = np.minimum(1, .95 / (np.abs(dry).max(axis=0) + 1e-9))
    gain = uniform_filter1d(minimum_filter1d(needed, size=177), size=177)
    top_cut = signal.ellip(10, .1, 90, CUTOFF_HZ, fs=SR, output="sos")
    return signal.sosfilt(top_cut, dry * gain)


dry = scene()
out = record(dry)
transcribe(out)
```